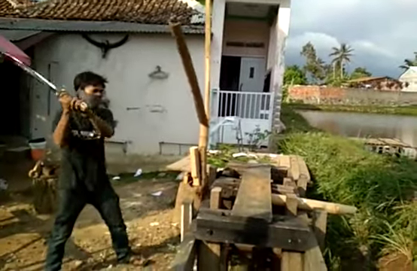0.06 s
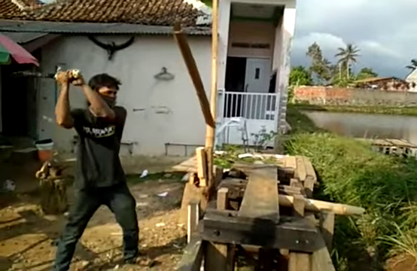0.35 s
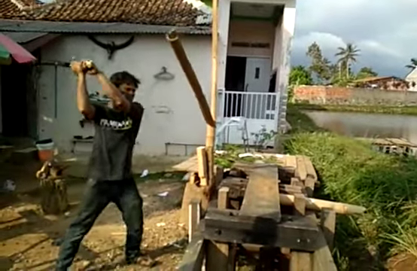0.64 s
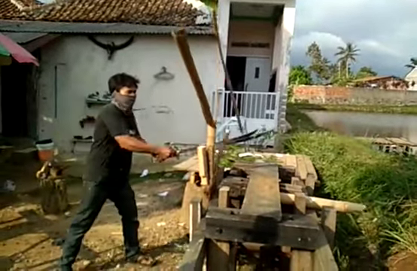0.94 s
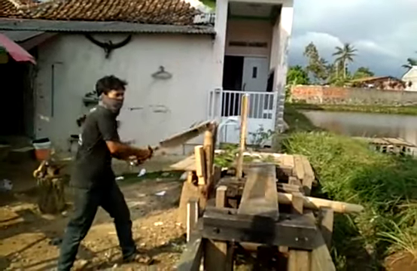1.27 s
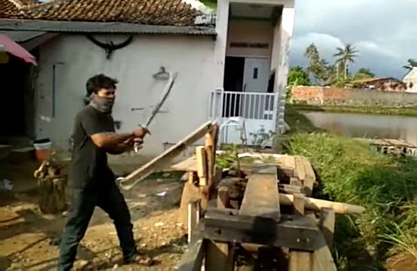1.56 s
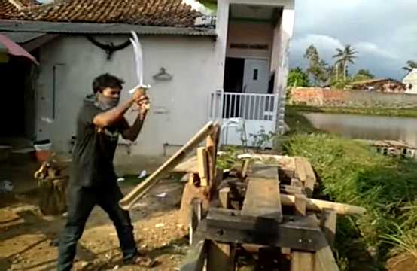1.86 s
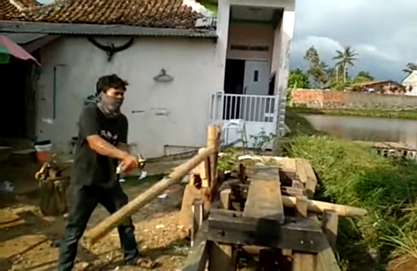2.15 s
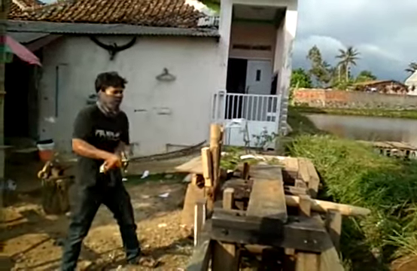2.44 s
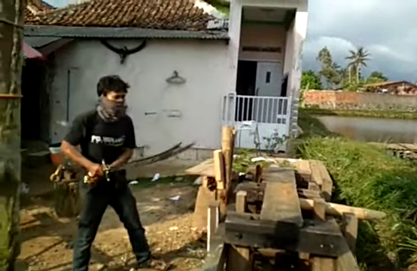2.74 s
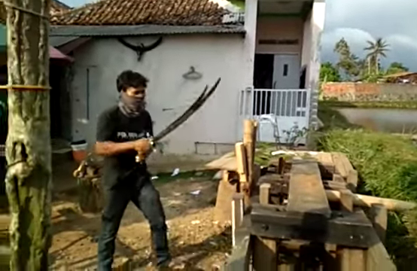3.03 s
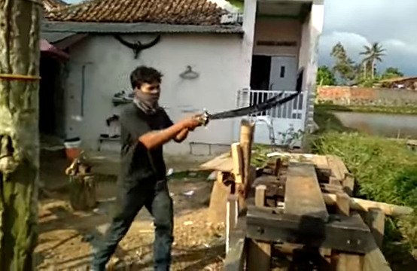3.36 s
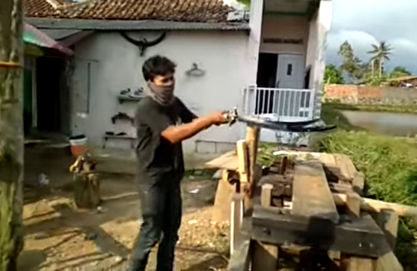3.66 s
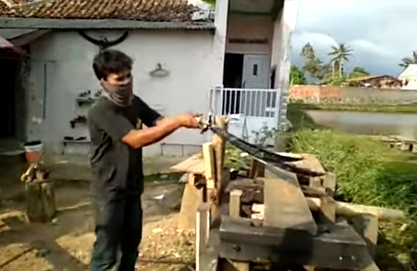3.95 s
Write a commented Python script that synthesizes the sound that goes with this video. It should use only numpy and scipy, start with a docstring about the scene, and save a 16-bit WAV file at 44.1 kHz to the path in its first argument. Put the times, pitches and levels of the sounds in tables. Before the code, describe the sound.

A sword cuts a bamboo pole with one sharp crack and brief splintering. The split piece creaks faintly, then drops and clatters hollowly on the ground, while gusts of wind rumble on the microphone in a yard.

```python
"""Sword cut through bamboo

In a yard between house walls a sword chops through a bamboo pole, exciting the modes of the tube.
The split piece knocks against the rack, hangs creaking by stick-slip on its last fibres, then drops
and clatters on the ground. Leaves rustle and turbulent gusts buffet both microphone ports;
the right port resonates high in the treble, and a limiter holds the loudest blows down."""
import sys
import numpy as np
from scipy import signal
from scipy.fft import rfft, irfft
from scipy.io import wavfile
from scipy.ndimage import uniform_filter1d, minimum_filter1d, map_coordinates

SR = 44100
rng = np.random.default_rng(int(sys.argv[2]) if len(sys.argv) > 2 else 0)


def transcribe(signal):
    """Save signal, clipped to [-1, 1], as a 16-bit WAV file at the path in sys.argv[1]."""
    frames = np.atleast_2d(signal).T
    limited = np.clip(frames, -1, 1)
    pcm = np.round(limited * 32767).astype(np.int16)
    wavfile.write(sys.argv[1], SR, pcm)


N = 176400
TIME = np.arange(N) / SR
BODY_WET_DB, CRACK_WET_DB = -5.5, -5
PIECE_PAN_DB, PIECE_LAG_S = 2.5, .00007

# cut pieces strike the rack and the ground: start_s, body_db, crack_db, rattle_s, thud_db
KNOCKS = [(1.163, -15.5, -8, 0.017, -20), (2.1767, -10.5, -4, 0.034, -12), (2.184, 4.5, -11, 0.013, -1),
          (2.198, 4.5, -14, 0.0089, -8), (2.223, -2.5, -15.5, 0.0092, -19), (2.245, -24, -13.5, 0.031, -32),
          (2.399, 1, -2, 0.017, -13), (2.497, -4.5, -5, 0.009, -13.5), (2.525, -16.5, -27, 0.02, -24)]
# spectrum of the hard skin cracking: frequency_hz, level_db
CRACK_SPECTRUM = [(600, 7.5), (2000, -1), (3500, -0.5), (5200, -1.5), (6500, -2.5), (9000, -2.5),
                  (12000, -3.5), (16000, -13)]


def from_db(db):
    return 10 ** (np.asarray(db) / 20)


def unit_energy(x):
    return x / np.sqrt(np.sum(x ** 2, axis=-1, keepdims=True) + 1e-20)


def in_time(rows):
    """Linear interpolation of each column after the first at every sample."""
    times, *columns = np.transpose(rows)
    return [np.interp(TIME, times, column) for column in columns]


def at_hz(points, hz):
    """Interpolation on a logarithmic frequency axis."""
    frequencies, values = np.transpose(points)
    return np.interp(np.log(hz + 1), np.log(frequencies), values)


def pan(left_minus_right_db):
    """Constant-power gains for a level difference between the ports."""
    gains = from_db(np.array([[.5], [-.5]]) * left_minus_right_db)
    return gains / np.sqrt(np.mean(gains ** 2, axis=0))


def drift(corner_hz, settle=4000):
    """Low-passed noise: a slow random fluctuation of unit rms."""
    r = np.exp(-2 * np.pi * corner_hz / SR)
    slow = signal.lfilter([1], [1, -2 * r, r * r], rng.standard_normal(N + settle))[settle:]
    return slow / np.sqrt(np.mean(slow ** 2) + 1e-20)


def through(x, response):
    """Convolution with an impulse response, cut to the scene's length."""
    return signal.fftconvolve(np.atleast_2d(x), np.atleast_2d(response), axes=1)[:, :N]


def colour(spectrum, size=8192):
    """Minimum-phase impulse response of unit energy with the given spectral shape."""
    cepstrum = irfft(np.log(from_db(at_hz(spectrum, np.fft.rfftfreq(size, 1 / SR)))))
    cepstrum[1:size // 2] *= 2
    cepstrum[size // 2 + 1:] = 0
    return unit_energy(irfft(np.exp(rfft(cepstrum))))


def bursts(rows, snap_s=.0032, rattle_per_s=1800, rattle_db=5.5, spread_db=3):
    """Transient excitation: a snap and a decaying rattle. Each level is the rms if packed into 1 ms."""
    drive, t = np.zeros(N + SR), TIME[:SR // 2]
    for start_s, level_db, decay_s in rows:
        snap = unit_energy(rng.standard_normal(len(t)) * np.exp(-t / snap_s))
        sizes = rng.choice([-1, 1], len(t)) * from_db(spread_db * rng.standard_normal(len(t)))
        rattle = unit_energy(sizes * (rng.random(len(t)) < rattle_per_s / SR) * np.exp(-t / decay_s))
        start = int(start_s * SR)
        drive[start:start + len(t)] += from_db(level_db) * unit_energy(snap + from_db(rattle_db) * rattle)
    return drive * np.sqrt(SR / 1000)


def slips(rows, per_s=1500, spread_db=3.5):
    """Stick-slip force: runs of random impulses that swell and fade, with levels as in bursts."""
    force = 0
    for start_s, level_db, rise_s in rows:
        age = np.clip((TIME - start_s) / rise_s, 0, 40)
        sizes = from_db(spread_db * rng.standard_normal(N)) * rng.choice([-1, 1], N)
        impulses = sizes * (rng.random(N) < per_s / SR)
        force = force + from_db(level_db) * unit_energy(impulses * age * np.exp(-age))
    return force * np.sqrt(SR / 1000)


def yard_echoes(build_s=.00057, hold_s=.019):
    """Diffuse reverberation: reflections from walls and ground decay exponentially, band by band."""
    # reverberation time: frequency_hz, t60_s
    decay_times = [(200, 0.23), (1500, 0.2), (4000, 0.33), (11000, 0.31)]
    t, echoes = TIME[:SR * 3 // 4], 0
    edges_hz = np.geomspace(100, 19000, 9)
    for low, high in zip(edges_hz, edges_hz[1:]):
        bandpass = signal.butter(2, [low, high], "band", fs=SR, output="sos")
        band = signal.sosfilt(bandpass, rng.standard_normal((2, len(t))))
        t60_s = at_hz(decay_times, np.sqrt(low * high))
        echoes = echoes + band * np.exp(-np.log(1000) * np.maximum(t - hold_s, 0) / t60_s)
    return unit_energy(echoes * (1 - np.exp(-t / build_s)))


def placed(x, wet_db, pan_db=0, lag_s=0):
    """Superposition of the direct sound, lag_s later at the left port, and the reverberant field."""
    direct = np.array([np.roll(x[0], int(lag_s * SR)), x[0]]) * pan(pan_db)
    return direct + from_db(wet_db) * through(x, yard_echoes())


def rustle(flicker_db=2):
    """Leaves and distant air: broadband noise under random amplitude modulation."""
    # background level: time_s, level_db
    levels = [(0, -46.5), (.1, -58), (.55, -60), (.7, -56.5), (1.0, -46.5), (1.7, -50), (2.05, -52.5),
              (2.7, -44), (3.2, -45.5), (3.7, -50), (3.85, -44), (4, -43.5)]
    # background spectrum: frequency_hz, level_db
    spectrum = [(30, 23.5), (110, 25), (220, -29), (400, 0), (1400, 3.5), (3500, -5.5), (6000, -10.5),
                (11000, -3), (15000, -7.5)]
    noise = through(rng.standard_normal((2, N)), colour(spectrum))
    return noise * from_db(in_time(levels)[0] + flicker_db * drift(corner_hz=46))


def wind(level_db=3.5, eddy_hz=35, eddy_db=2.5, eddy_speedup=.2):
    """Convected turbulence: a frozen pressure field sweeps each port, brighter in faster flow."""
    # gust strength: time_s, level_db, left_minus_right_db
    gusts = [(0.0, -44, -9.5), (0.31, -50.5, -0.5), (0.39, -53, -19), (0.5, -30, -7), (0.87, -28, -8.5),
             (0.93, -21.5, -31), (1.0, -19, 4), (1.02, -17, -3), (1.12, -13.5, -5), (1.28, -20.5, 2),
             (1.59, -16.5, 4.0), (1.89, -28, -12.5), (1.97, -15, -35), (2.0, -25, -16), (2.12, -45, 7),
             (2.19, -25.5, -2), (2.28, -38.5, -10), (2.32, -30, -17), (2.38, -51, -2), (2.47, -23.5, -19),
             (2.51, -34, -10), (2.57, -29.5, -25), (2.68, -25.5, 2), (2.72, -25.5, -10),
             (3.36, -16.5, 11.5), (3.5, -20, -10), (3.62, -21, 4.5), (3.66, -21.5, -13), (3.75, -16.5, 1.5),
             (4.0, -20.5, -5.5)]
    # air speed past each port: time_s, speed_ratio
    flow_left = [(0, 0.72), (.45, 0.53), (.94, 0.54), (1.0, .9), (1.582, 1.126), (1.85, 0.7), (2.88, 0.59),
                 (3.05, .92), (3.3, 1.25), (3.66, .72), (3.88, 1.254), (4, 0.94)]
    flow_right = [(0, 0.64), (0.449, 0.56), (.7, 0.88), (1.098, 1.056), (1.401, .85), (1.581, 1.083),
                  (1.971, .72), (2.6, .68), (2.78, 0.9), (3.1, 0.96), (3.36, .65), (3.45, 1.04),
                  (3.62, 0.77), (3.72, 1.126), (4, 0.95)]
    # turbulence at a speed ratio of 1: frequency_hz, level_db
    spectrum = [(15, -9.5), (40, -16), (85, 2.5), (125, -1), (250, -9), (450, -25.5), (800, -40.5),
                (1600, -70.5), (5000, -101)]
    gust_db, side_db = in_time(gusts)
    ports = []
    for gain, flow in zip(from_db(gust_db) * pan(side_db), (flow_left, flow_right)):
        eddy = drift(eddy_hz)
        speed = in_time(flow)[0] * np.exp(eddy_speedup * eddy)
        field = signal.fftconvolve(rng.standard_normal(2 * N), colour(spectrum), "same")
        pressure = map_coordinates(field, [np.cumsum(speed)], order=3, mode="mirror")
        pressure *= from_db(eddy_db * eddy)
        running_rms = np.sqrt(uniform_filter1d(pressure ** 2, size=3500) + 1e-12)
        ports.append(gain * pressure / running_rms)
    return from_db(level_db) * np.array(ports)


def buffets(width_s=.0053, size=2048):
    """Small eddies strike one port as Gaussian bursts of pressure; a faster eddy has a higher pitch."""
    # passing eddies: centre_s, level_db, pitch_hz, port
    eddies = [(0.611, -15, 192, "R"), (0.632, -27.5, 317, "L"), (0.68, -18.5, 265, "R"),
              (0.724, -22, 277, "R"), (0.762, -17.5, 314, "R"), (0.923, -14, 256, "R"),
              (1.066, -12, 1004, "R"), (1.086, -5.5, 640, "R"), (1.102, -11, 318, "R"),
              (1.123, 1, 380, "R"), (1.159, -6, 570, "L"), (1.182, -2.5, 290, "R"), (1.223, -9.5, 393, "R"),
              (1.364, -8.5, 259, "R"), (1.375, -12, 342, "L"), (1.45, -16, 375, "L"),
              (1.519, -9.5, 350, "L"), (1.533, -10, 450, "R"), (1.568, -14, 474.4, "L"),
              (1.615, -10.5, 380, "R"), (1.659, -13.5, 390, "L"), (1.969, -17.5, 195, "R"),
              (2.674, -21, 396.7, "L"), (2.705, -17, 347, "R"), (2.917, -18.5, 288.8, "R"),
              (3.059, -14.5, 303, "R"), (3.112, -25.5, 479.4, "R"), (3.153, -29.5, 479, "L"),
              (3.195, -16.5, 364, "L"), (3.235, -8, 320.6, "L"), (3.292, -14.5, 368, "L"),
              (3.414, -14, 459, "L"), (3.426, -9.5, 445, "R"), (3.496, -17.5, 457, "R"),
              (3.521, -15, 451.5, "R"), (3.555, -18.5, 525.4, "L"), (3.568, -9, 290, "R"),
              (3.703, -8, 423.7, "R"), (3.728, -7, 559.3, "R"), (3.744, -5.5, 343, "R"),
              (3.824, -16.5, 341, "R"), (3.866, -15, 559.3, "L"), (3.89, -22, 899.4, "L"),
              (3.95, -16, 403, "L")]
    # spectrum of an eddy: pitch_ratio, level_db
    shape = [(.2, -4.5), (.6, 1.5), (1, 1), (1.8, -13), (3, -26.5), (5, -45), (12, -72.5)]
    ports = np.zeros((2, N + size))
    swell = np.exp(-((np.arange(size) - size / 2) / SR / width_s) ** 2 / 2)
    for centre_s, level_db, pitch_hz, port in eddies:
        response = colour([(pitch_hz * ratio, db) for ratio, db in shape])
        pressure = irfft(rfft(rng.standard_normal(size)) * rfft(response[:size]))
        burst = unit_energy(swell * pressure) * np.linalg.norm(swell)
        start = int(centre_s * SR) - size // 2
        ports["LR".index(port), start:start + size] += from_db(level_db) * burst
    return ports[:, :N]


def far_taps():
    """Faint hollow impacts, far enough off that reverberation outweighs the direct sound."""
    # distant impacts: start_s, level_db, pitch_hz
    taps = [(0.095, -45.5, 480), (0.203, -35.5, 960)]
    shape = [(.5, -22), (1.03, 0), (1.54, -3), (2, -12), (8, -34)]  # pitch_ratio, level_db
    sound = 0
    for start_s, level_db, pitch_hz in taps:
        response = colour([(pitch_hz * ratio, db) for ratio, db in shape])
        sound = sound + through(bursts([(start_s, level_db, .003)]), response)
    return placed(sound, wet_db=2.5)


def port_clicks():
    """Tiny transients at the right port, heard as direct sound alone."""
    # dry clicks: start_s, level_db
    clicks = [(0.608, -32.5), (0.791, -37.5), (0.864, -38), (2.108, -40)]
    # their spectrum: frequency_hz, level_db
    spectrum = [(500, 3), (1500, 1), (5000, -17), (14000, -23)]
    return through(bursts([(s, db, .0005) for s, db in clicks]), colour(spectrum)) * pan(-29)


def tick_and_chirps(chirp_hz=10634, chirp_q=69):
    """Band-limited transients: a bright tick close by and faint, thin whistling chirps near 10.6 kHz."""
    # bright tick: start_s, level_db
    ticks = [(0.914, -26)]
    # its spectrum: frequency_hz, level_db
    spectrum = [(3000, -26), (8000, -18), (10500, 10), (11500, 14), (13000, 2), (16000, -16)]
    # high whistling chirps: start_s, level_db, decay_s
    chirps = [(1.92, -44, 0.048), (1.96, -39.5, 0.019), (2.122, -38.5, 0.053)]
    tick = through(bursts([(s, db, .002) for s, db in ticks]), colour(spectrum))
    narrow_band = np.sin(2 * np.pi * chirp_hz * TIME) * np.exp(-np.pi * chirp_hz / chirp_q * TIME)
    whistle = through(bursts(chirps), unit_energy(narrow_band))
    return placed(tick + whistle, wet_db=-10, pan_db=-4)


def creaks_and_scrapes():
    """Stick-slip friction: fibres creak as the split piece sags, and dry pieces scrape the ground."""
    # runs of slips: start_s, level_db, rise_s
    creaks = [(1.549, -28.5, 0.005), (1.593, -26.5, 0.0084), (1.615, -25.5, 0.0071), (1.731, -38.5, 0.0021),
              (1.764, -40.5, 0.0027), (1.838, -27, 0.011)]
    scrapes = [(2.768, -25.5, 0.016), (2.909, -36.5, 0.0033), (2.977, -20.5, 0.012), (3.385, -39.5, 0.016),
               (3.472, -36, 0.0043), (3.789, -38, 0.0081)]
    # response of the fibres: frequency_hz, level_db
    fibre_spectrum = [(400, 10.5), (1300, 4), (2300, 1), (3100, 6), (4100, 3), (5200, -7.5), (8000, -7),
                      (12000, -2), (16000, -18.5)]
    creaking = through(slips(creaks), colour(fibre_spectrum))
    scraping = through(slips(scrapes), colour(CRACK_SPECTRUM))
    return placed(creaking + scraping, wet_db=-3.5)


def tube_ring(modes):
    """Modal synthesis: a tube's impulse response is a sum of damped sinusoids."""
    t, ring = TIME[:SR // 2], 0
    for k, (hz, db, t60_s) in enumerate(modes):
        decay = np.exp(-np.log(1000) * t / t60_s)
        ring = ring + (-1) ** k * from_db(db) * np.sin(2 * np.pi * hz * t) * decay
    return unit_energy(ring)


def pole_ring(level_db=-13):
    """Free vibration of the hollow pole after an impulse."""
    # pole modes: frequency_hz, level_db, t60_s
    modes = [(760, 2, .06), (1022, 1, .09), (1292, 5, .12), (1440, 3, .14), (1568, 9, .2), (1769, 6, .14),
             (1935, 5, .14), (2059, 4, .11), (2219, 3, .13), (2597, -8, .18), (3410, -7, .14)]
    return from_db(level_db) * tube_ring(modes)


def blows(rows, body_spectrum, ring, pan_db, lag_s=0, extra_wet_db=0):
    """Impact excitation gives a woody thwack, the ring of the tube and a bright crack of the skin."""
    start_s, body_db, crack_db, rattle_s = np.transpose(rows)[:4]
    force = bursts(zip(start_s, body_db, rattle_s))
    body = through(force, colour(body_spectrum)) + through(force, ring)
    crack = through(bursts(zip(start_s, crack_db, rattle_s / 2)), colour(CRACK_SPECTRUM))
    return (placed(body, BODY_WET_DB + extra_wet_db, pan_db, lag_s)
            + placed(crack, CRACK_WET_DB + extra_wet_db, pan_db, lag_s))


def clacks(ring_db=-2.5):
    """Collisions between bamboo pieces excite the quickly damped modes of the short offcut."""
    # collisions: start_s, body_db, crack_db, rattle_s
    hits = [(1.1215, -21.5, -6.5, 0.0074), (1.141, -13, -1.5, 0.01), (3.003, -14, -22, 0.005),
            (3.0095, -14.5, -20.5, 0.004)]
    # body of a clack: frequency_hz, level_db
    spectrum = [(300, -17), (900, -5), (1500, 8.5), (2500, -4), (3200, -14), (5500, -13.5)]
    # offcut modes: frequency_hz, level_db, t60_s
    modes = [(1553, -8.5, 0.098), (1890, 3, 0.089), (2710, 3, 0.035)]
    ring = from_db(ring_db) * tube_ring(modes)
    return blows(hits, spectrum, ring, PIECE_PAN_DB, PIECE_LAG_S, extra_wet_db=-6)


def thuds():
    """The ground's damped, low-frequency response makes a heavy landing thud."""
    # ground response: frequency_hz, level_db
    spectrum = [(100, -7), (400, 1), (650, -5), (1200, -26)]
    force = bursts([(start_s, thud_db, rattle_s) for start_s, _, _, rattle_s, thud_db in KNOCKS])
    return placed(through(force, colour(spectrum)), BODY_WET_DB, PIECE_PAN_DB, PIECE_LAG_S)


def knocks():
    """Impacts on the rack and the ground excite the pole's modes."""
    # body of a knock: frequency_hz, level_db
    spectrum = [(250, -14), (650, -3), (1000, 1.5), (1500, 2), (2150, -1), (2600, -9.5), (3800, -11),
                (5500, -23.5)]
    return blows(KNOCKS, spectrum, pole_ring(), PIECE_PAN_DB, PIECE_LAG_S)


def splitting():
    """Brittle fracture: the edge bites with a snap, then the pole crackles apart."""
    # the edge enters the hard skin: start_s, level_db, decay_s
    bites = [(0.9835, -3, 0.0029)]
    # fibres rip: start_s, level_db, rise_s
    splinters = [(1.02, -10, 0.052), (1.17, -14.5, 0.019), (1.22, -20.5, 0.0062)]
    skin = colour(CRACK_SPECTRUM)
    snap = placed(through(bursts(bites), skin), wet_db=-6, pan_db=-7)
    return snap + placed(through(slips(splinters, per_s=240), skin), wet_db=0)


def sword_cut():
    """The blade's passage is a broadband force that sets the pole ringing."""
    # the stroke: start_s, body_db, crack_db, splitting_s
    cuts = [(0.983, 8.5, 1.5, 0.027)]
    # body of the chop: frequency_hz, level_db
    spectrum = [(150, 10), (400, 16), (780, 14), (1050, 14.5), (1550, 12), (2200, 8), (2800, -3.5),
                (6000, -6.5)]
    return blows(cuts, spectrum, pole_ring(), pan_db=4)


def scene():
    """Linear superposition of all sources at the two ports."""
    bamboo = knocks() + thuds() + clacks() + sword_cut() + splitting() + creaks_and_scrapes()
    return bamboo + tick_and_chirps() + port_clicks() + far_taps() + wind() + buffets() + rustle()


def record(dry, shelf_hz=7150, shelf_db=-18, ring_hz=11130, ring_q=8.4, ring_db=11,
           limit_db=-4, release_db_per_s=106, cutoff_hz=15900):
    """A shelf dulls the left port and the right resonates; peak limiting and a low-pass follow."""
    treble = signal.lfilter(*signal.butter(1, shelf_hz, "high", fs=SR), dry[0])
    ringing = signal.lfilter(*signal.iirpeak(ring_hz, ring_q, fs=SR), dry[1])
    left = dry[0] + (from_db(shelf_db) - 1) * treble
    right = dry[1] + (from_db(ring_db) - 1) * ringing
    ports = np.array([left, right])
    over_db = np.maximum(20 * np.log10(np.abs(ports) + 1e-9) - limit_db, 0)
    release_db = release_db_per_s * TIME
    duck_db = np.maximum.accumulate(over_db + release_db, axis=1) - release_db
    gain = uniform_filter1d(minimum_filter1d(from_db(-duck_db), size=45), size=45)  # 1 ms attack
    lowpass = signal.ellip(10, .2, 90, cutoff_hz, fs=SR, output="sos")
    return signal.sosfilt(lowpass, ports * gain)


dry = scene()
out = record(dry)
transcribe(out)
```